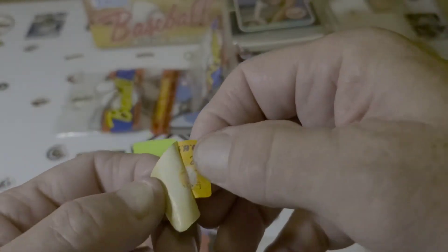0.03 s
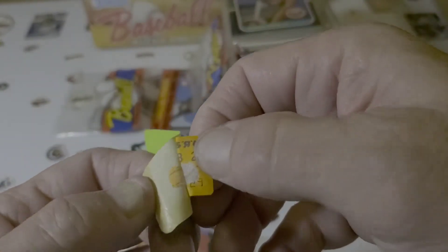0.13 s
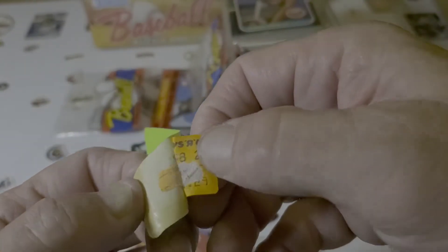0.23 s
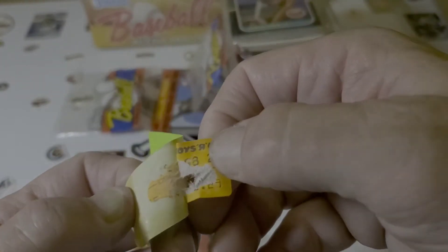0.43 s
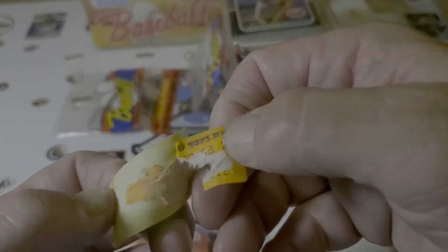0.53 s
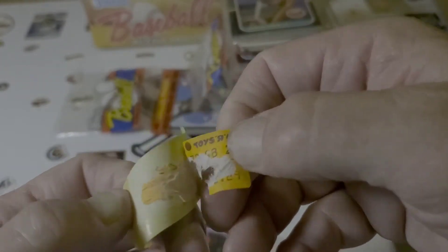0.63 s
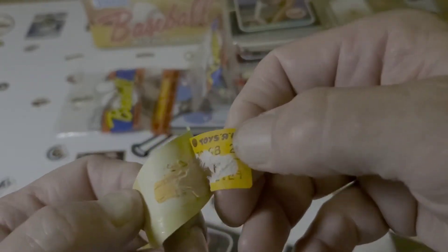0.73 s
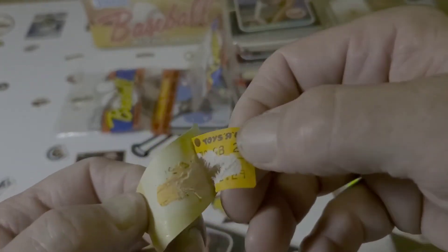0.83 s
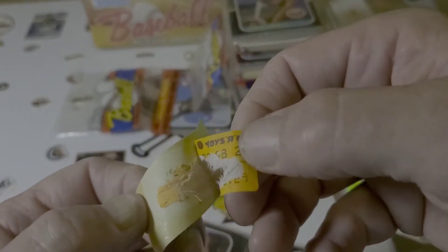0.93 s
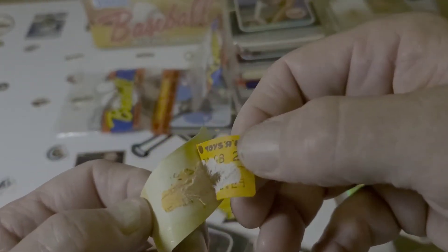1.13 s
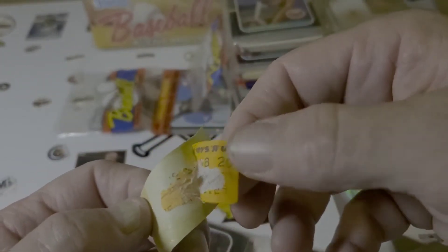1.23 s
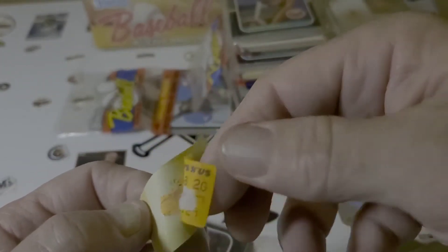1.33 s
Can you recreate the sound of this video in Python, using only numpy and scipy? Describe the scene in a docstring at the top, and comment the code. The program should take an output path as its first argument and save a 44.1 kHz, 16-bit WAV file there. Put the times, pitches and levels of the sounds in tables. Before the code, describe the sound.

Close stereo sound of a paper sticker peeling, mostly on the left: bright tiny snaps growing fuller, low thuds from handling, a brief crisp rip with a papery card ring, then quiet room noise and hum.

```python
"""A paper sticker is peeled off cardboard, close to the left microphone in a small quiet room with faint mains hum.
At first the glue lets go in tiny ticks and stick-slip crackle, filtered by a freed flap that deepens as it grows.
Fingers slide softly on the card as noise; then the pulling hands make low decaying bumps, mostly on the left.
Last, the rest tears away in one short rasp of fibre breaks, and the loosened card rings with it.
A few bumps and two faint late ticks trail off into the hum and room noise."""
import sys
import numpy as np
from scipy import signal
from scipy.fft import rfft, irfft
from scipy.io import wavfile

SR = 44100
rng = np.random.default_rng(int(sys.argv[2]) if len(sys.argv) > 2 else 0)


def dump(signal):
    """Clip the signal to [-1, 1] and save it as 16-bit WAV at the path in sys.argv[1]."""
    limited = np.clip(np.atleast_2d(signal).T, -1, 1)
    pcm = np.round(limited * 32767).astype(np.int16)
    wavfile.write(sys.argv[1], SR, pcm)


N = 61739
TIME = np.arange(N) / SR

# Tick, peel, snap and tear levels get a further gain; slide and bump levels are used as given,
# and hum levels only swell and waver.
# single glue snaps (time [s], level [dB])
GLUE_TICKS = [(.0063, -21), (.0155, -26), (.0246, -24), (.0355, -23), (.0468, -23), (.0541, -26),
              (.077, -18), (.0837, -26), (.1053, -31), (.1347, -28), (.1577, -26), (.192, -16),
              (.2134, -25), (.22, -18), (.2296, -29), (.2415, -30), (.3125, -31), (.3265, -27),
              (.3545, -28), (.3688, -24), (.3719, -26), (.3869, -26), (.399, -27), (.4141, -23),
              (.4219, -27), (.4561, -22), (.468, -28), (.4795, -28), (.5044, -23), (.5142, -24),
              (.788, -44), (1.3771, -47)]
# strength of the slow peel (time [s], level [dB])
PEEL_STRENGTH = [(0, -50.5), (.06, -55.5), (.09, -49.5), (.18, -55), (.235, -48.5), (.285, -55),
                 (.325, -48), (.38, -46), (.44, -51.5), (.48, -49), (.53, -50), (.56, -44)]
# low edge of the flap's radiation (time [s], frequency [Hz])
FLAP_EDGE = [(0, 10240), (.05, 8700), (.09, 6860), (.14, 5900), (.22, 5500), (.36, 4290), (.53, 3940)]
# gain of the crackle into the card (time [s], gain [dB])
CARD_GAIN = [(0, -2), (.3, -12), (.38, 1.5), (.53, 4.5)]
# colour of the crackle through the flap (frequency [Hz], gain [dB])
GLUE_COLOUR = [(2500, -4), (4800, -5), (6000, -6.5), (7500, -11), (9500, -7), (12000, -8), (14500, 1),
               (16000, -16)]
# colour of the single ticks (frequency [Hz], gain [dB])
TICK_COLOUR = [(2500, -17.5), (4800, -12.5), (7500, -10.5), (9500, -6.5), (12000, -2), (14500, 1.5),
               (16000, 2.5)]
# colour of the crackle in the card (frequency [Hz], gain [dB])
CARD_COLOUR = [(300, -25), (1050, -19), (1400, -12), (2100, -18.5), (2700, -14), (3300, -24.5),
               (5000, -18.5), (16000, -47.5)]
# mains hum partials (frequency [Hz], level before swell [dB])
HUM_PARTIALS = [(59.2, -60.5), (118.4, -56), (241, -71)]
# slow swell of the hum (time [s], gain [dB])
HUM_SWELL = [(0, -4.5), (.08, 5), (.14, -5.5), (.22, 10), (.3, -1.5), (.8, 2.5), (.92, -6), (1.0, 3.5),
             (1.09, 4), (1.14, -5.5), (1.245, 7.5), (1.3, -0.5)]
# room noise spectrum, relative (frequency [Hz], density [dB])
AIR_COLOUR = [(25, -25.5), (50, -7), (70, -7.5), (88, -15.5), (120, -2), (160, -13), (240, -18.5),
              (450, -32.5), (950, -45), (1500, -51.5), (7000, -61), (10500, -60), (15500, -44.5)]
# likeness of the room noise in both ears (frequency [Hz], correlation [-1 to 1])
AIR_SAME = [(60, .6), (130, 1), (290, .8), (640, 0), (1400, 0.035)]
# left-over-right lean of the room noise (frequency [Hz], level ratio [dB])
AIR_LEAN = [(60, -1), (1300, -3.5), (8000, 0), (15000, 5.5)]
# fingers sliding on the card (time [s], level [dB])
SLIDE_STRENGTH = [(0, -65), (.2, -71), (.34, -60.5), (.42, -53.5), (.5, -56), (.72, -69.5), (.85, -88.5)]
# colour of the sliding, relative (frequency [Hz], gain [dB])
SLIDE_COLOUR = [(60, -21.5), (170, -0.5), (260, -2), (450, -5), (750, -25), (2000, -50)]
# bumps of the hands (time [s], level [dB], pitch [Hz])
HAND_BUMPS = [(.364, -23.5, 90.3), (0.379, -25, 84), (0.43, -16.5, 83.3), (.476, -24.5, 73.6),
              (0.506, -17, 72), (.535, -24.5, 85.3), (0.551, -16, 76.8), (0.582, -19, 94.8),
              (.606, -17.5, 100.3), (0.641, -23, 81), (0.665, -21.5, 65.5), (0.691, -21.5, 82.4),
              (.769, -27, 71.3)]
# colour of the rubbing in a bump (frequency [Hz], gain [dB])
RUB_COLOUR = [(40, -2), (110, 6), (175, 13.5), (240, -4.5), (400, -14.5), (700, -34.5), (1500, -46.5),
              (4000, -73.5)]
# strength of the final tear (time [s], level [dB])
TEAR_STRENGTH = [(.539, -65.5), (.543, -40.5), (.558, -42.5), (.57, -33.5), (.587, -34.5), (.606, -34.5),
                 (.625, -36), (.637, -46), (.644, -26), (.648, -52.5)]
# fibre breaks in the tear (time [s], level [dB], splinter decay constant [s])
FIBRE_SNAPS = [(0.543, -24, .003), (0.5618, -25.5, .001), (0.5715, -21.5, 0.0022), (.5739, -28, 0.0024),
               (0.5809, -22, 0.0015), (.5957, -14.5, 0.0014), (.6, -20, .001), (0.6046, -7.5, .001),
               (0.6074, -14, 0.0054), (0.612, -22.5, .002), (.618, -25.5, 0.0017), (.6318, -22, 0.0014),
               (.6422, -21, 0.0022)]
# colour of the rasp (frequency [Hz], gain [dB])
RASP_COLOUR = [(200, -14), (1050, -21.5), (1500, -9), (2100, -8.5), (3100, -12.5), (4100, -5.5),
               (5200, -7.5), (6500, -7), (9500, -8), (12000, -2.5), (13500, 0.5), (15500, 0.5)]
# colour of the fibre breaks (frequency [Hz], gain [dB])
SNAP_COLOUR = [(200, -28), (1000, -26), (1800, -14.5), (3100, -15.5), (4600, -1.5), (6500, -7),
               (9500, -4.5), (12000, 8), (13500, 1.5), (15500, -11.5)]
# colour of the loosened card (frequency [Hz], gain [dB])
LOOSE_COLOUR = [(200, -25.5), (430, -5.5), (630, -27.5), (810, 0), (1050, -13), (1500, -12), (3000, -16.5),
                (6500, -22), (10000, -34), (16000, -34)]
# bending modes of the card, before RING_DB (frequency [Hz], level [dB], t60 [s])
CARD_MODES = [(813, -41, .06), (1020, -45, .04), (1400, -44, .04), (1856, -38, .07)]
# room decay (frequency [Hz], t60 [s])
ROOM_T60 = [(200, 0.093), (1500, .24), (6000, 0.18), (15000, .19)]

# crackle: mean slip rate, spread of slip sizes, rms of fine grit relative to slips
PEEL_SLIPS_PER_S, PEEL_SPREAD_DB, PEEL_GRIT = 240, 5, .35
TEAR_SLIPS_PER_S, TEAR_SPREAD_DB, TEAR_GRIT = 450, 3.5, .7
GRIT_PER_S = 5000
TICK_DB, PEEL_DB, SNAP_DB, TEAR_DB = 7.5, 4.5, 6.5, 3.5
SPLINTER_DB = -15  # relative to the crack
NEAR_DB, NEAR_T60_S, NEAR_RIGHT_DB = -1, .013, -6.5  # near bounces
RIGHT_DB, RIGHT_LAG_S = -13.5, .00018  # direct sound at the right ear
FLAP_RING_RATIO, FLAP_RING_DB, FLAP_Q = 1.3, -3, 5.5
HUM_WAVER_RMS = .32
AIR_RMS_DB = -52.5
SLIDE_RIGHT_DB = -7
BUMP_PEAK_S, BUMP_RIGHT_DB = .0096, -24.5
LOOSE_S, LOOSE_RISE_S, LOOSE_RIGHT_DB = .578, .02, -3.5
RING_DB = -11.5
ROOM_DB = -10.5
EDGE_HZ, FADE_S = 16000, .005


def amp(db):
    """Decibels to gain."""
    return 10 ** (np.asarray(db) / 20)


def unit(x):
    """Scales to rms 1."""
    return x / np.sqrt(np.mean(x ** 2) + 1e-20)


def at_hz(points, hz):
    """Reads a table on a log-frequency axis."""
    f, value = np.transpose(points)
    return np.interp(np.log(hz + 1), np.log(f + 1), value)


def curve(points, **ends):
    """Reads a table along time."""
    return np.interp(TIME, *np.transpose(points), **ends)


def left_right(right_db):
    """Gains of a source at full level on the left."""
    return amp([[0], [right_db]])


def colour(x, points):
    """Minimum-phase filter with the given spectrum."""
    hz = abs(np.fft.fftfreq(4096, 1 / SR))
    log_gain = np.log(amp(at_hz(points, hz)))
    impulse = np.fft.ifft(np.exp(np.conj(signal.hilbert(log_gain)))).real
    return signal.fftconvolve(np.atleast_2d(x), impulse[None, :2048], axes=1)[:, :N]


def clicks(rows):
    """One impulse for each row of time and level."""
    out = np.zeros(N)
    for s, db in rows:
        out[int(np.clip(s * SR, 0, N - 1))] += amp(db)
    return out


def fibre_grit():
    """Single fibres let go at random instants with random sizes."""
    return rng.standard_normal(N) * (rng.random(N) < GRIT_PER_S / SR)


def crackle(strength, per_s, spread_db, grit):
    """Stick and slip: uneven small releases over a dense grit of single fibres."""
    at = (np.cumsum(rng.gamma(2, .5, 2000)) / per_s * SR).astype(int)
    size = amp(spread_db * np.clip(rng.standard_normal(len(at)), -2, 1.5))
    inside = at < N
    slips = np.zeros(N)
    slips[at[inside]] = size[inside]
    mix = unit(slips) + grit * unit(fibre_grit())
    return unit(mix) * amp(curve(strength, left=-150, right=-150))


def scatter(drive, count=16):
    """Snaps arrive left first, then bounce between paper and fingers along one of several random paths."""
    t = TIME[:1024]
    spot = rng.integers(0, count, N)
    out = np.zeros((2, N))
    for k in range(count):
        near = rng.standard_normal((2, len(t))) * amp(-60 * t / NEAR_T60_S) * (t > .0002)
        path = amp(NEAR_DB) * left_right(NEAR_RIGHT_DB) * near / np.linalg.norm(near[0])
        path[0, 0] += 1
        path[1, round(RIGHT_LAG_S * SR)] += amp(RIGHT_DB)
        out += signal.fftconvolve((drive * (spot == k))[None], path, axes=1)[:, :N]
    return out


def flap(drive):
    """The freed flap is a high-pass with a resonance just above its edge; both fall as it grows."""
    step = np.round(8 * np.log2(curve(FLAP_EDGE)))  # eighths of an octave
    out = np.zeros((2, N))
    for k in np.unique(step):
        hz = min(2 ** (k / 8), SR / 3)
        edge = signal.cheby1(4, 1, hz, "high", fs=SR, output="sos")
        part = signal.sosfilt(edge, drive * (step == k) + 1e-18)
        peak = signal.iirpeak(hz * FLAP_RING_RATIO, FLAP_Q, fs=SR)
        out += part + amp(FLAP_RING_DB) * signal.lfilter(*peak, part)
    return out


def peel():
    """Crackle and single glue snaps leave through the flap; the crackle also sounds in the card."""
    slips = crackle(PEEL_STRENGTH, PEEL_SLIPS_PER_S, PEEL_SPREAD_DB, PEEL_GRIT)
    slips = scatter(amp(PEEL_DB) * slips)
    ticks = scatter(amp(TICK_DB) * clicks(GLUE_TICKS))
    freed = flap(colour(slips, GLUE_COLOUR) + colour(ticks, TICK_COLOUR))
    card = colour(slips * amp(curve(CARD_GAIN)), CARD_COLOUR)
    return freed + card


def mains_hum():
    """Sine partials, each with its own slow waver, under one shared swell."""
    hz = np.fft.rfftfreq(N, 1 / SR)
    hum = np.zeros(N)
    for f, db in HUM_PARTIALS:
        waver = unit(irfft(rfft(rng.standard_normal(N)) * np.exp(-(hz / 7) ** 2), N))
        tone = np.sin(2 * np.pi * (f * TIME + rng.random()))
        hum += amp(db) * np.sqrt(2) * (1 + HUM_WAVER_RMS * waver) * tone
    return hum * amp(curve(HUM_SWELL))


def room_noise():
    """Coloured noise, partly shared between the ears by frequency."""
    hz = np.fft.rfftfreq(N, 1 / SR)
    a, b = rfft(rng.standard_normal((2, N)))
    same = np.clip(at_hz(AIR_SAME, hz), -1, 1)
    lean = amp(at_hz(AIR_LEAN, hz) / 2)
    left = a * lean
    right = (same * a + np.sqrt(1 - same ** 2) * b) / lean
    air = irfft(np.array([left, right]) * amp(at_hz(AIR_COLOUR, hz)), N)
    return amp(AIR_RMS_DB) * unit(air)


def fingers():
    """Skin slides softly on the card during the pull, mostly on the left: coloured noise."""
    skin = unit(colour(rng.standard_normal(N), SLIDE_COLOUR))
    return left_right(SLIDE_RIGHT_DB) * skin * amp(curve(SLIDE_STRENGTH))


def bumps():
    """Each jerk of the hands is a dull swing of a few cycles with a little rubbing in it."""
    swing = np.zeros(N)
    for s, db, hz in HAND_BUMPS:
        t = np.maximum(TIME - s, 0)
        u = t / BUMP_PEAK_S
        swing += amp(db) * (u * np.exp(1 - u)) ** 2 * np.sin(2 * np.pi * hz * t)
    envelope = abs(signal.hilbert(swing))
    rub = colour(envelope * rng.standard_normal(N), RUB_COLOUR)
    return left_right(BUMP_RIGHT_DB) * (swing + rub)


def splinters():
    """Each breaking fibre cracks once and splinters for a few milliseconds."""
    out = clicks([row[:2] for row in FIBRE_SNAPS])
    for s, db, decay_s in FIBRE_SNAPS:
        t = TIME - s
        out += amp(db + SPLINTER_DB) * fibre_grit() * (t > 0) * np.exp(-(t / decay_s) ** 2)
    return out


def card_ring(x):
    """The strip of card rings briefly with a few bending modes."""
    t = TIME[:SR // 8]
    ring = sum(amp(db - 60 * t / t60) * np.sin(2 * np.pi * hz * t) for hz, db, t60 in CARD_MODES)
    return signal.fftconvolve(x, ring)[:N]


def tear():
    """The last of the sticker rips off: dense fibre breaks, then the loosened card joins in both ears."""
    rips = crackle(TEAR_STRENGTH, TEAR_SLIPS_PER_S, TEAR_SPREAD_DB, TEAR_GRIT)
    rasp = scatter(amp(TEAR_DB) * rips)
    snaps = scatter(amp(SNAP_DB) * splinters())
    loosened = np.clip((TIME - LOOSE_S) / LOOSE_RISE_S, 0, 1)
    shake = (rasp + snaps)[0] * loosened
    card = colour(shake, LOOSE_COLOUR) + amp(RING_DB) * card_ring(shake)
    return colour(rasp, RASP_COLOUR) + colour(snaps, SNAP_COLOUR) + left_right(LOOSE_RIGHT_DB) * card


def space(x):
    """A short room tail of decaying noise, driven by the left channel; the bass dies soonest."""
    t = TIME[:SR // 2]
    hz, when, z = signal.stft(rng.standard_normal((2, len(t))), SR, nperseg=256)
    decay = amp(-60 * when / at_hz(ROOM_T60, hz)[:, None])
    tail = signal.istft(z * decay, SR, nperseg=256)[1][:, :len(t)] * (t > .004)
    tail /= np.linalg.norm(tail[0])
    return x + amp(ROOM_DB) * signal.fftconvolve(x[:1], tail, axes=1)[:, :N]


def scene():
    """The peel and the tear in the room, with the hum, room noise and hands."""
    return space(peel() + tear()) + mains_hum() + room_noise() + fingers() + bumps()


def record(dry):
    """The recorder's band limit, with soft ends."""
    ends = np.sin(np.pi / 2 * np.minimum(np.minimum(TIME, TIME[::-1]) / FADE_S, 1)) ** 2
    low_pass = signal.firwin(511, EDGE_HZ, window=("kaiser", 9), fs=SR)
    return signal.oaconvolve(dry * ends, low_pass[None], "same")


dry = scene()
out = record(dry)
dump(out)
```